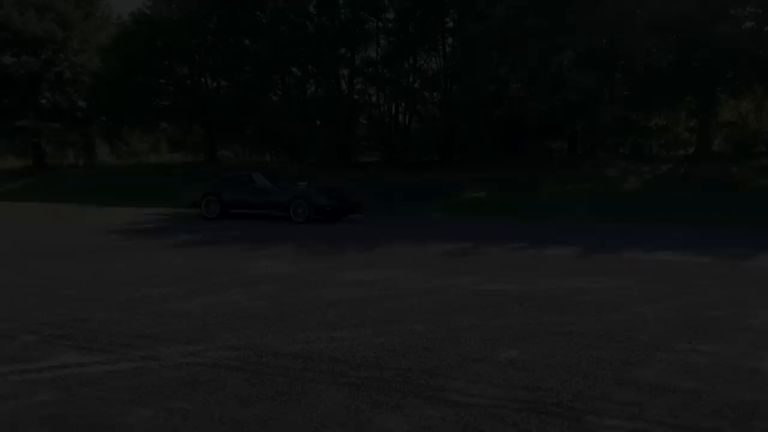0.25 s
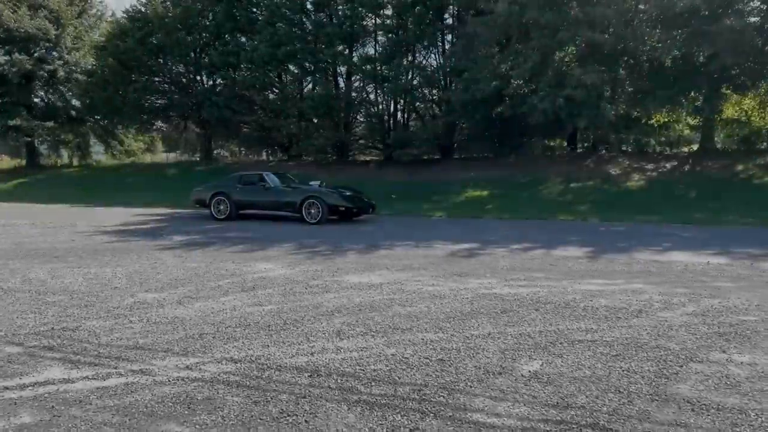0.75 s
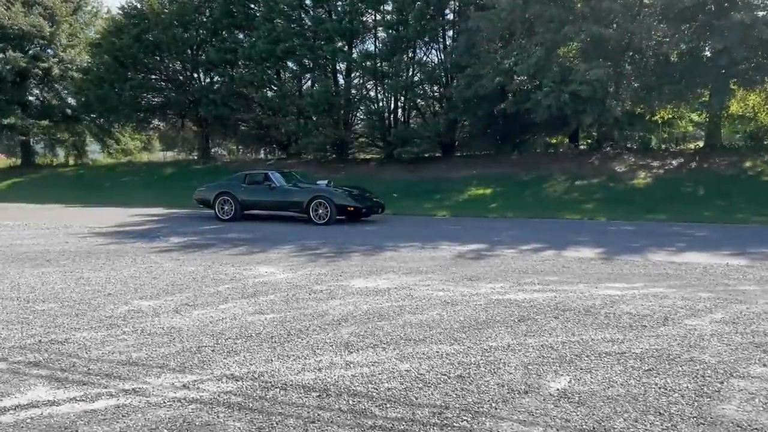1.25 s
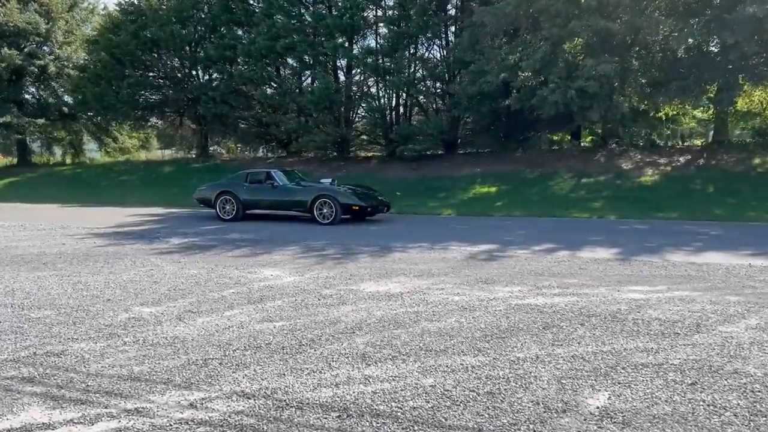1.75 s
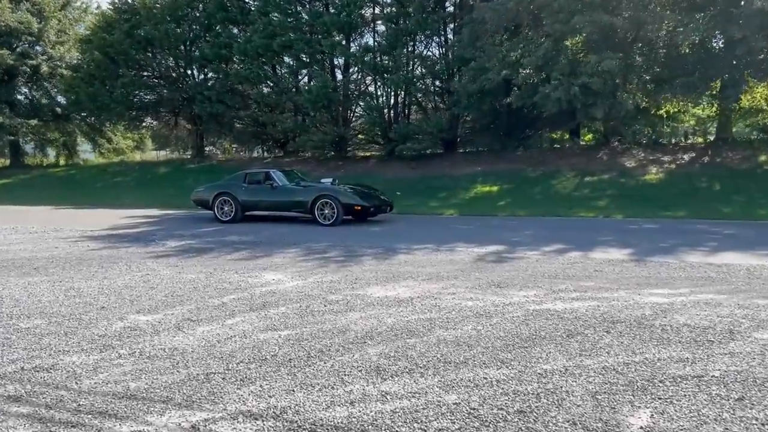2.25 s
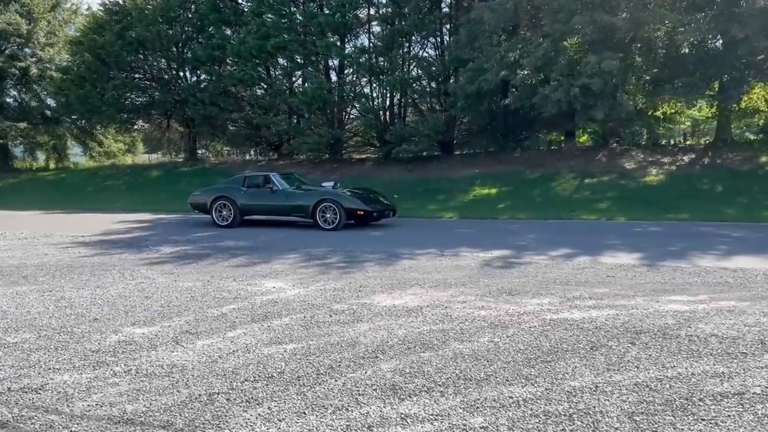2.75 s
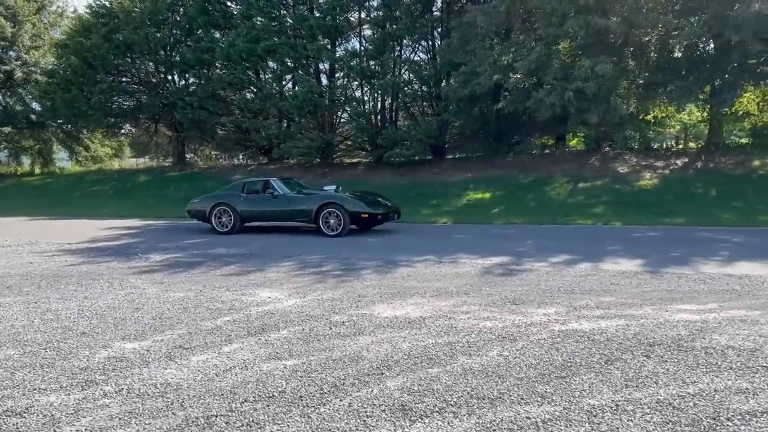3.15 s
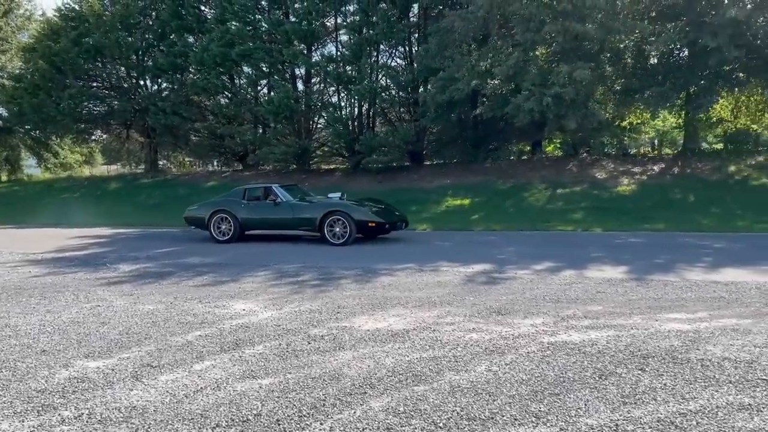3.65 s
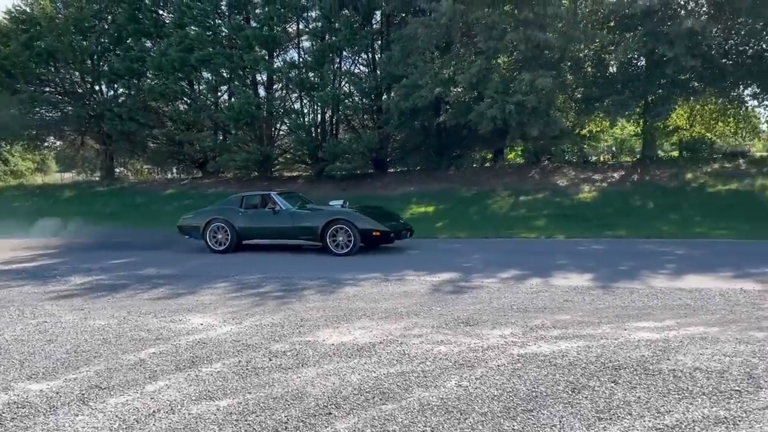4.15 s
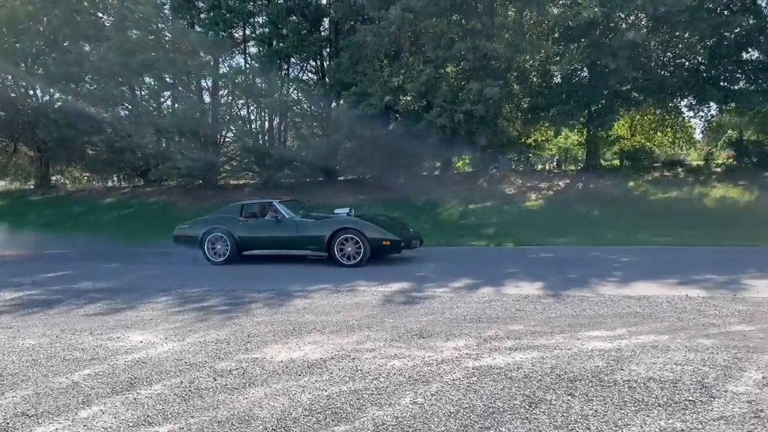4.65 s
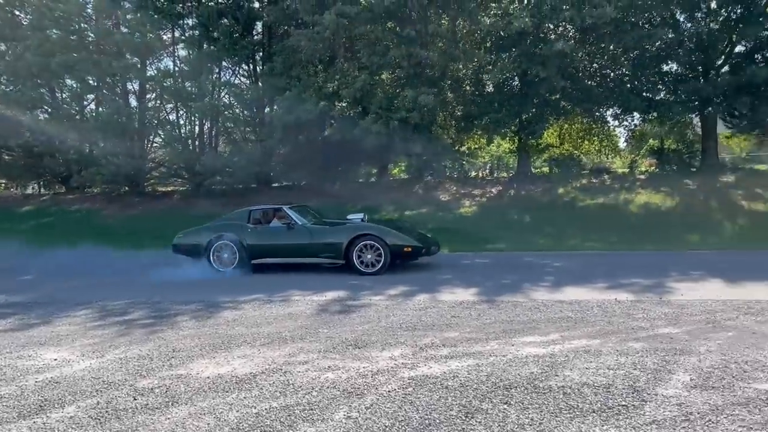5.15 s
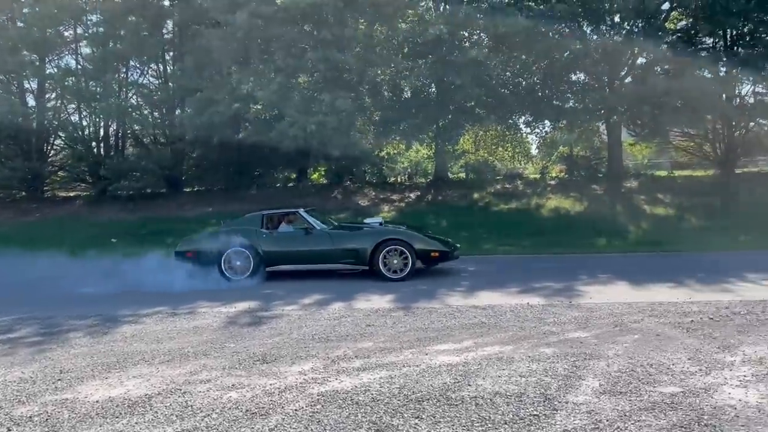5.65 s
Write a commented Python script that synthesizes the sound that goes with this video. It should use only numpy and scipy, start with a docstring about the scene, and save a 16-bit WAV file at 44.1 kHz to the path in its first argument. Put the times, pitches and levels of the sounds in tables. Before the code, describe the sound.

After a scrap of another car's hum, a loping V8 idles with dull clacks, blips, climbs to a raspy howl, then holds steady.

```python
"""A nearby car idles for an instant and fades out, as a few steady tones over a rumble of filtered noise.
A V8 coupe across a tree-lined road then fades in: it lopes at idle with a few clacks and blips its throttle.
It climbs to high revs with a brief burst of tyre hiss on the way, then holds a lower steady speed. Engine
orders, harmonics of the firing cycle, make its boom and bark; noise gated at every firing makes its rasp,
clatter, hiss and sizzle. Dull roadside echoes follow the noises; two microphone ports hear it in stereo."""
import sys
import numpy as np
from scipy import signal
from scipy.fft import rfft, irfft
from scipy.io import wavfile
from scipy.ndimage import uniform_filter1d

SR = 44100
rng = np.random.default_rng(int(sys.argv[2]) if len(sys.argv) > 2 else 0)


def store_wav(level_fs):
    """Save 16-bit WAV to argv[1]."""
    pcm = np.round(np.clip(np.atleast_2d(level_fs), -1, 1) * 32767)
    wavfile.write(sys.argv[1], SR, pcm.T.astype(np.int16))


N = 259749
TIME = np.arange(N) / SR  # s
BINS = np.maximum(np.arange(N // 2 + 1) * SR / N, 1)  # Hz
NEAR_BEATS = [0, 2, 3, 5]  # the near bank's firings among the eight of a cycle


def from_db(db):
    """Decibels are logarithmic: 20 dB is a tenfold amplitude."""
    return 10 ** (np.asarray(db) / 20)


def rms_one(x):
    """Mean-square normalisation: scale a signal to unit power."""
    return x / np.sqrt(np.mean(x ** 2) + 1e-20)


def in_time(rows):
    """Linear interpolation in time: one curve for each column of a table."""
    seconds, *columns = np.transpose(rows)
    return [np.interp(TIME, seconds, column) for column in columns]


def at_hz(points, hz):
    """Interpolation on a logarithmic frequency axis, where equal ratios are equal steps."""
    table_hz, value = np.transpose(points)
    return np.interp(np.log(hz), np.log(np.maximum(table_hz, 1)), value)


def bump(center, width):
    """Gaussian envelope: a smooth rise and fall of height 1 around a moment."""
    return np.exp(-((TIME - center) / width) ** 2)


def drift(rate):
    """Low-passed white noise: slow random change of unit power, with a double pole at the rate in Hz."""
    step = 40  # samples between the slow values
    settling = 2000  # slow values dropped while the filter settles
    pole = np.exp(-2 * np.pi * rate * step / SR)
    white = rng.standard_normal(N // step + settling + 2)
    slow = rms_one(signal.lfilter([1], [1, -2 * pole, pole * pole], white)[settling:])
    return np.interp(np.arange(N) / step, np.arange(len(slow)), slow)


def levelled(x, window):
    """Automatic gain: divide by the short-term rms, which evens the slow level but keeps the pulsing."""
    power = uniform_filter1d(x ** 2, max(int(window * SR), 2))
    power = uniform_filter1d(power, max(int(window * SR / 2), 2))
    return x / np.sqrt(power + 1e-12)


def turbulence(spectrum, gate):
    """Amplitude-modulated noise: gated, then coloured, partly coherent in stereo and of unit power."""
    # likeness of the two microphone ports: (frequency [Hz], correlation [0-1])
    likeness = [(150, 1), (700, .98), (1400, .94), (2800, .75), (5000, .7), (9000, .9), (15000, .92)]
    mid, side = rfft(rng.standard_normal((2, N)) * gate)
    alike = np.clip(at_hz(likeness, BINS), 0, 1)
    pair = np.sqrt(1 + alike) * mid + np.sqrt(1 - alike) * side * np.array([[1], [-1]])
    return rms_one(irfft(pair * from_db(at_hz(spectrum, BINS)), N))


def near_idle():
    """Additive synthesis: phase-wandering sines and low-weighted noise form a hum that fades away."""
    # tones of the nearby car before its fade: (frequency [Hz], level [dB rms])
    hum_tones = [(73, -59), (97, -55), (121, -57), (146, -54), (230, -65)]
    hum = np.zeros(N)
    for hz, db in hum_tones:
        phase = 2 * np.pi * hz * TIME + 0.3 * drift(6.6)
        hum += from_db(db) * np.sqrt(2) * np.sin(phase)
    rumble_spectrum = [(30, -9), (120, -0.5), (400, -16.0), (1500, -28), (6000, -40.5)]
    rumble = from_db(-57) * turbulence(rumble_spectrum, 1)
    return (hum + rumble) * np.interp(TIME, [0, .06, .148, .155], [1.35, 1.0, 0.52, 0])


def roadside(x, dull_hz):
    """Discrete reflection: the bank and trees return delayed copies that have lost treble."""
    # echoes against the direct sound: (delay [s], level [dB])
    echoes = [(.031, -7), (.058, -11.5), (.094, -12.5), (0.142, -41)]
    dull = signal.sosfilt(signal.butter(1, dull_hz, fs=SR, output="sos"), x)
    heard = x.copy()
    for delay, db in echoes:
        heard += from_db(db) * np.pad(dull, ((0, 0), (int(delay * SR), 0)))[:, :N]
    return heard


def ports(x):
    """Interchannel differences: two microphone ports hear the car with different level and phase."""
    # level difference: (frequency [Hz], left over right [dB])
    lean = [(150, .1), (700, .6), (1000, 1.8), (1300, -.7), (2000, 0), (2700, 3.5), (3900, 2), (4800, 4),
            (6000, 6), (7500, 3), (8400, 3), (9200, 0)]
    # phase difference: (frequency [Hz], left ahead of right [rad])
    lead = [(0, 0), (1720, .55), (2410, 1.7), (3100, 1.1), (4650, 1.2), (6800, .5), (7670, 1.6),
            (9000, 1.7), (10050, np.pi), (12000, 5.6), (13900, 3 * np.pi), (15500, 12)]
    phase = np.interp(BINS, *np.transpose(lead))
    half = from_db(at_hz(lean, BINS) / 2) * np.exp(.5j * phase)  # half to each port
    return irfft(rfft(x) * np.array([half, 1 / half]), N)


def clacks():
    """Impulsive excitation: brief dull noise bursts start at once and decay exponentially."""
    # clacks at idle, before the trim: (time [s], peak level [dB])
    strikes = [(0.572, -42), (0.693, -38), (0.764, -34), (0.814, -37), (1.365, -27)]
    decay_s, trim_db = 0.01, -0.5
    envelope = np.zeros(N)
    for start, db in strikes:
        envelope += from_db(db + trim_db) * (TIME >= start) * np.exp(-np.abs(TIME - start) / decay_s)
    return envelope * turbulence([(100, 5), (400, 6), (1400, 0), (2500, -33), (8000, -46)], 1)


def tyre_slip_db():
    """Sliding friction: the hiss jumps as the tyres break loose and settles as they heat up."""
    slip_s, attack_s, settle_s = 3.62, .04, 0.15
    jump_db = 2.5  # the settling already trims it during the attack
    since = np.maximum(TIME - slip_s, 0)
    return jump_db * np.minimum(since / attack_s, 1) * np.exp(-since / settle_s)


def gulp_db(bark_db):
    """Transient intake flow: a high-pass finds how far the throttle is ahead of its recent average."""
    gulp_s = 0.07  # time constant of the intake's gulp of air
    keep = np.exp(-1 / (gulp_s * SR))
    return signal.lfilter([keep, -keep], [1, -keep], bark_db - bark_db[0])


def hiss_and_sizzle(bark_db, speed, revving, gate):
    """Jet and friction noise: broadband treble follows the throttle and pulses with the firings."""
    # hiss of jets and spinning tyres: (frequency [Hz], relative density [dB per Hz])
    hiss_spectrum = [(1500, -1.5), (2900, -1), (3600, 0.5), (4300, -4.5), (5700, -1), (6900, -6),
                     (8400, 2.5), (9100, 1), (10100, -10), (11700, -1), (13400, -12.5), (15700, -13)]
    # thin sizzle: (frequency [Hz], relative density [dB per Hz])
    sizzle_spectrum = [(5000, -38), (8500, -18), (11800, 3), (13500, -4), (15500, -2.5)]
    lead_s = .015  # the hiss rises a moment before the bark builds
    follows = 0.97  # share of the bark's swing in dB
    hiss_gulp, sizzle_gulp = 0.25, .3  # extra dB per dB of sudden opening; the sizzle gets both
    hiss_trim_db, sizzle_trim_db = -11, -15

    gulp = gulp_db(bark_db)
    level_db = follows * np.interp(TIME + lead_s, TIME, bark_db) + hiss_gulp * gulp + tyre_slip_db()
    hiss = from_db(level_db + hiss_trim_db) * turbulence(hiss_spectrum, 3.6 + gate)
    # the sizzle is absent at slow idle and thins out towards 41 cycles per s
    thinning = np.clip((41 - speed) / 21, 0, 1) * revving
    sizzle_level = from_db(level_db + sizzle_trim_db + sizzle_gulp * gulp) * thinning
    return hiss + sizzle_level * turbulence(sizzle_spectrum, 1.5 + gate)


def puffs(turns, decay, spread_db, far_db):
    """Pulsed flow: each opening valve lets out a random-sized puff that decays until the next one."""
    beat, within = np.divmod(8 * turns, 1)
    beat = beat.astype(int)
    near = np.isin(beat % 8, NEAR_BEATS)
    size_db = spread_db * rng.standard_normal(4096)[beat] + np.where(near, 0, far_db)
    return rms_one(from_db(size_db) * np.exp(-within / decay))  # decay in beats


def rasp_and_clatter(revving, gate):
    """Equal-power crossfade: gas rasp takes over from mechanical clatter as the revs rise."""
    # gas rasp at high revs: (frequency [Hz], relative density [dB per Hz])
    rasp_spectrum = [(30, -12), (120, -1), (300, -2), (400, -1), (520, -4.5), (730, 4), (1000, -5),
                     (1280, 1.5), (1550, -3.5), (2000, -5.5), (2400, -7.5), (2900, -26.5), (4000, -18),
                     (8000, -50)]
    # mechanical clatter at idle: (frequency [Hz], relative density [dB per Hz])
    clatter_spectrum = [(30, -27), (150, -4), (290, 9.5), (380, 2), (470, 0.5), (700, 7.5), (950, -4),
                        (1100, 3.5), (1450, -5.5), (1700, -1.5), (2300, -7.5), (2900, -19), (6000, -23)]
    rasp = np.sqrt(revving) * turbulence(rasp_spectrum, 1.0 + gate)
    clatter = np.sqrt(1 - revving) * turbulence(clatter_spectrum, 7.9 + gate)
    return rasp + clatter


def sweeping(speed):
    """Rate of change of the revs: 0 when held, 1 from twelve cycles per s each second."""
    change = uniform_filter1d(np.abs(np.gradient(speed)), SR // 5)
    return np.clip(change * SR / 12, 0, 1)


def combustion(speed):
    """Cyclic variation: firings grow more even with speed; changing revs trade tone for rasp."""
    # (speed [cycles per s], unevenness [0-1], relative bark tone [dB], relative rasp [dB])
    burn = [(12.8, 0.65, -15.5, 0), (19.64, 0.6, -2.5, -2.5), (23.1, 0.19, 0.5, -3), (43.7, 0, -1.04, -6.5)]
    sweep_tone_db, sweep_rasp_db = -1.5, 1.26  # at full sweep
    speeds, *columns = np.transpose(burn)
    uneven, tonal_db, rasp_db = [np.interp(speed, speeds, column) for column in columns]
    sweep = sweeping(speed)
    return uneven, tonal_db + sweep_tone_db * sweep, rasp_db + sweep_rasp_db * sweep


def bank(order):
    """Phasor sum over the eight firings of a cycle, those of the far bank weaker."""
    beats = np.arange(8)
    strength = np.where(np.isin(beats, NEAR_BEATS), 1, .35)
    return np.sum(strength * np.exp(-2j * np.pi * order * beats / len(beats)))


def swell_db(order):
    """Spectral balance in motion: one engine order swells or sinks for a while."""
    # (time [s], engine order, half-width [s], change [dB])
    swells = [(1.3, 8, 0.93, 4.5), (2.8, 3, 0.53, -1), (3.15, 15, 0.22, 18), (3.4, 8, 0.32, -4.5),
              (3.5, 7, 0.18, 7.5), (3.721, 12, 0.22, 8.5), (4.05, 5, 0.15, 2.5), (4.14, 16, 0.078, 5),
              (4.4, 8, .15, 5.5), (4.45, 32, 0.14, -20), (4.91, 32, 0.1, 11.5), (5.3, 32, 0.32, 6),
              (5.45, 16, 0.12, 6.5), (5.5, 8, 0.46, 11), (5.7, 3, 1.3, 11)]
    return sum(db * bump(s, width) for s, k, width, db in swells if round(k) == order)


def exhaust_tones(turns, speed, uneven, load, ripple_db, count=66):
    """Source-filter principle: engine orders through pipe resonances, split into boom and bark."""
    # orders 1, 2, 3 ..; uneven firing in each bank favours 3, 5, 8, 11, 13, 16: (relative level [dB])
    order_db = [-8, -11.5, -2, -6.5, 6, -0.5, -7, 13, 5.5, -0.5, 8, 5.5, 10.5, 3, 1, 12, 2.5, -5.5, 8, 2.5,
                9, -23, 6.5, 7.5, 1, 8.5, -36, 8, 1, 3, 5.5, 6.5, -19, -5, 6.5, -3]
    # response of the exhaust under load: (frequency [Hz], gain [dB])
    pipes = [(25, -30), (45, -15), (65, 5.5), (90, 14.5), (130, 9), (170, 0.5), (230, -6), (340, -9.5),
             (480, -13.5), (700, -4.5), (1000, -8), (1300, -6), (1700, -9), (2600, -14)]
    # response on a light throttle: (frequency [Hz], gain [dB])
    pipes_light = [(25, -34), (42, -4), (56, 11.5), (72, 11.5), (94, 12), (112, 2), (135, -7), (163, 0),
                   (200, -14.5), (300, -26.5), (700, -36), (2600, -51)]
    shake_per_order = 0.0063  # high orders feel every small change between firings
    blur_order = 31.6  # while the revs move, orders from about here up dissolve into roar

    climbing = sweeping(speed)
    boom, bark = np.zeros(N), np.zeros(N)
    for k in range(1, count + 1):
        hz = k * speed
        low = np.clip((320 - hz) / 60, 0, 1)  # the boom's share
        pipes_db = load * at_hz(pipes, hz) + (1 - load) * at_hz(pipes_light, hz)
        # a moving order sweeps through narrow pipe resonances and flickers
        pipes_db = pipes_db + ripple_db * climbing * (1 - low) * drift(4.6)
        level_db = order_db[min(k, len(order_db)) - 1] + swell_db(k) + pipes_db
        # reflections in the pipes smear the pulses, more so in the high orders
        smear = min(.05 * k, 1.1) * rng.standard_normal()
        angle = 2 * np.pi * k * turns + np.angle(bank(k)) + smear
        # random modulation of amplitude and phase, with its added power partly compensated
        shake = uneven + shake_per_order * k + climbing * (k / blur_order) ** 2
        flutter_hz = min(5 + k * k / 30, 45)
        wobble = shake * (drift(flutter_hz) + 1j * drift(flutter_hz))
        wave = np.real((1 + wobble) * np.exp(1j * angle)) / np.sqrt(1 + shake ** 2)
        tone = from_db(level_db) * wave
        boom += low * tone
        bark += (1 - low) * tone
    return levelled(boom, window=.09), levelled(bark, window=.11)


def lope(turns, revving):
    """Cyclic misfire: at idle some cylinders fire weakly about once a cycle, by a changing amount."""
    weak_firing = np.cos(np.pi * turns + .4 * drift(4)) ** 6
    dropout = weak_firing * np.clip(.4 + .35 * drift(5), 0, 1)
    return 1 + (1 - revving) * (.13 - dropout)


def boom_level_db():
    """Envelope control: the boom sags briefly wherever the engine stumbles at low revs."""
    # exhaust boom before sags and trim: (time [s], level [dB])
    boom_curve = [(0.3, -21), (0.7, -24), (1.7, -19), (2.0, -12), (2.22, -10), (2.5, -13.5), (2.98, -7.5),
                  (3.5, -9.5), (4.1, -14), (4.7, -17), (5.89, -18)]
    # stumbles: (time [s], depth [dB])
    stumbles = [(0.8, 4), (2.062, 13), (2.33, 3.5), (2.52, 10), (2.68, 3.5), (2.83, 1)]
    return in_time(boom_curve)[0] - sum(db * bump(s, .035) for s, db in stumbles)


def scene():
    """Superposition: crank speed and throttle drive every layer of the coupe, after the nearby idle."""
    # crank speed through idle, blip, climb and hold: (time [s], four-stroke cycles [per s])
    speed_curve = [(0.7, 12.1), (1.3, 10.9), (1.85, 11.1), (2.12, 13.0), (2.22, 22.0), (2.38, 21.3),
                   (2.6, 17.5), (2.88, 19.6), (3.08, 24.4), (3.38, 26.9), (3.68, 31.3), (3.88, 35.2),
                   (4.42, 47.3), (4.6, 49.1), (4.72, 42.6), (4.87, 41.4), (5.5, 41.43), (5.89, 42.2)]
    # throttle, as the level of the bark before trims: (time [s], level [dB])
    throttle = [(0.8, -48), (1.8, -43), (1.96, -38), (2.08, -40.5), (2.22, -25), (2.5, -39.5),
                (2.74, -33.5), (2.88, -20.5), (3.05, -19), (3.5, -18), (3.95, -13.5), (4.6, -16),
                (4.71, -18), (4.9, -16.5), (5.89, -18)]
    boom_trim_db, bark_trim_db, rasp_trim_db = -0.3, 0.45, -0.5
    fade_start_s, fade_length_s = .165, 0.7

    speed, = in_time(speed_curve)
    bark_db, = in_time(throttle)
    uneven, tonal_db, rasp_db = combustion(speed)
    turns = 1 + np.cumsum(speed) / SR + .0008 * drift(25)  # cycles, with a little jitter
    load = np.clip((speed - 18.5) / 5, 0, 1)
    revving = np.clip((speed - 13) / 8, 0, 1)

    gate = puffs(turns, decay=0.84, spread_db=5.0, far_db=4.0)
    rasp = from_db(bark_db + rasp_db + rasp_trim_db) * rasp_and_clatter(revving, gate)
    treble = hiss_and_sizzle(bark_db, speed, revving, gate)
    noise = roadside(rasp + treble + clacks(), dull_hz=3040)

    boom, bark = exhaust_tones(turns, speed, uneven, load, ripple_db=3.5)
    boom = from_db(boom_level_db() + boom_trim_db) * boom * lope(turns, revving)
    bark = from_db(bark_db + tonal_db + bark_trim_db) * bark
    fade_in = np.clip((TIME - fade_start_s) / fade_length_s, 0, 1)
    return ports(boom + bark + noise) * fade_in + near_idle()


def record(dry):
    """Soft saturation rounds the highest peaks, and a steep low-pass cuts the top."""
    cutoff_hz = 15800
    rounded = dry / (1 + np.abs(dry / .96) ** 6) ** (1 / 6)
    return signal.sosfilt(signal.ellip(12, .1, 90, cutoff_hz, fs=SR, output="sos"), rounded)


dry = scene()
out = record(dry)
store_wav(out)
```